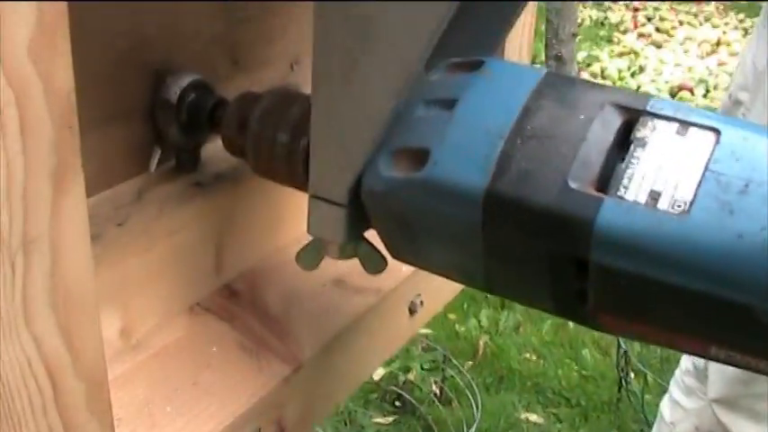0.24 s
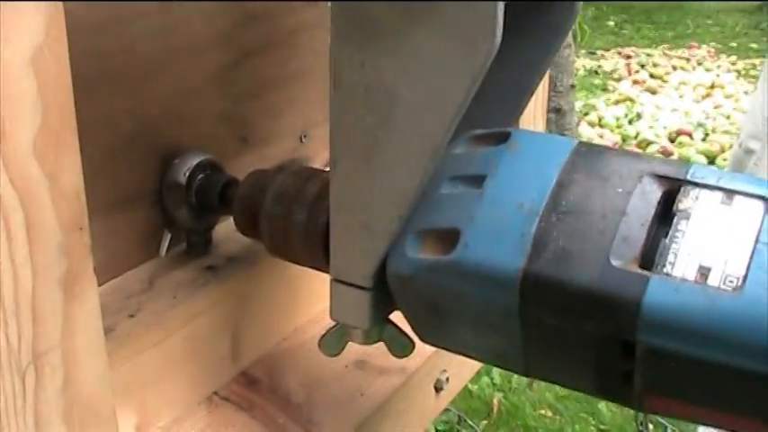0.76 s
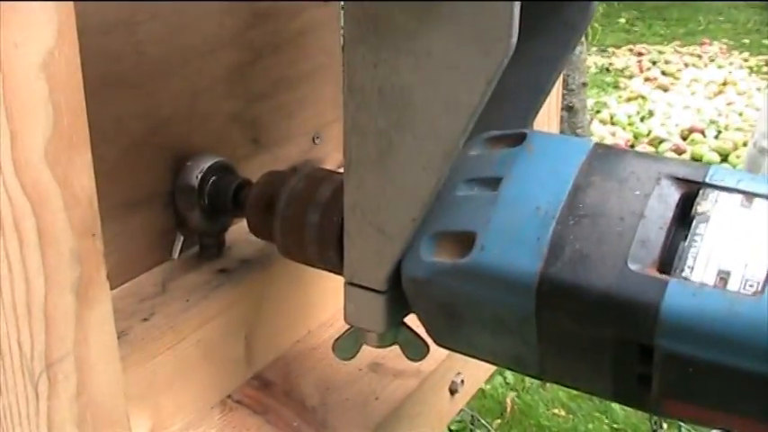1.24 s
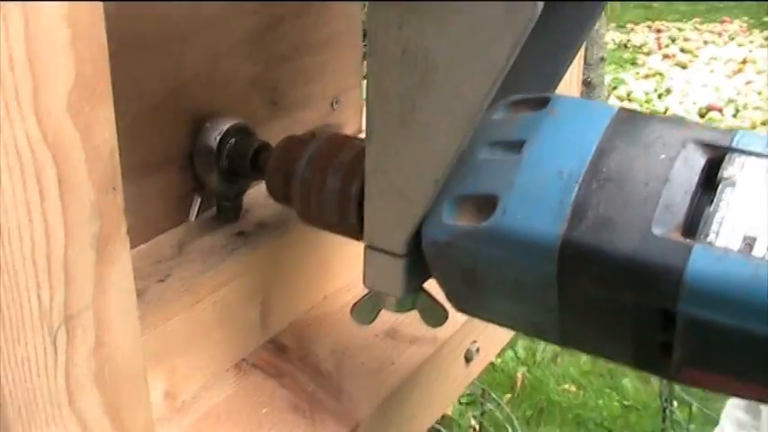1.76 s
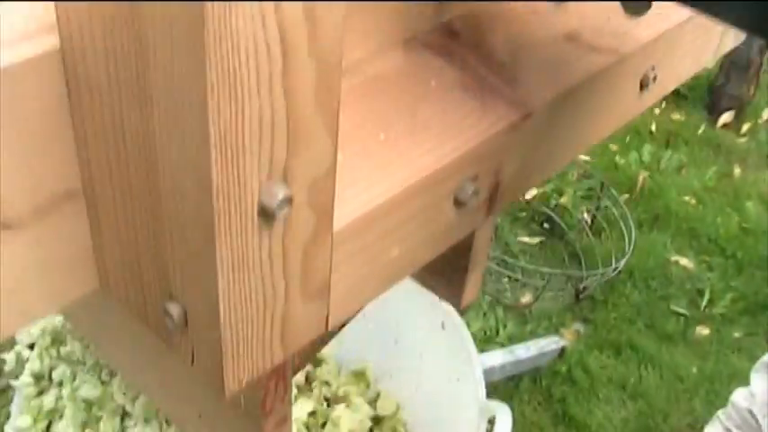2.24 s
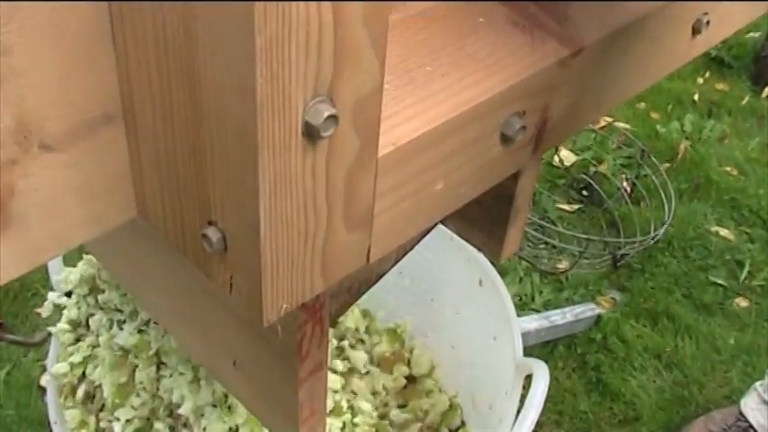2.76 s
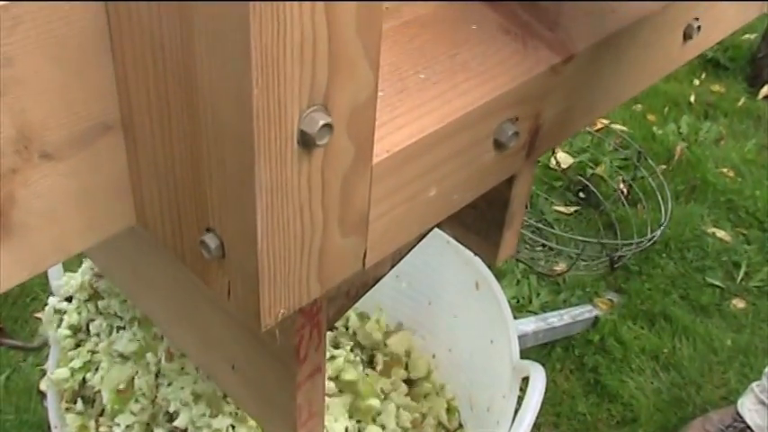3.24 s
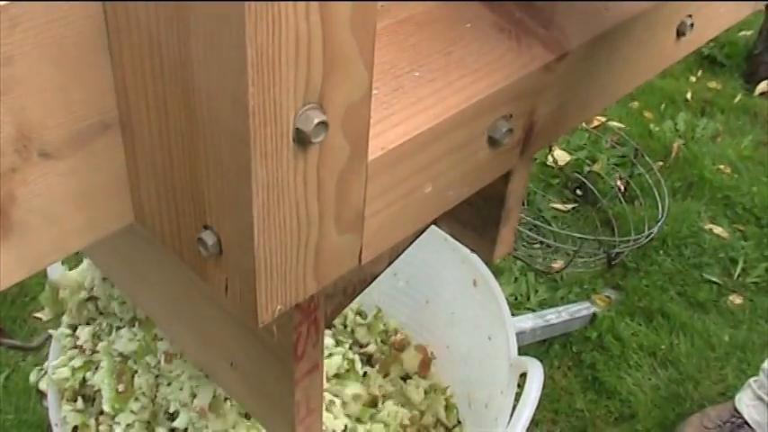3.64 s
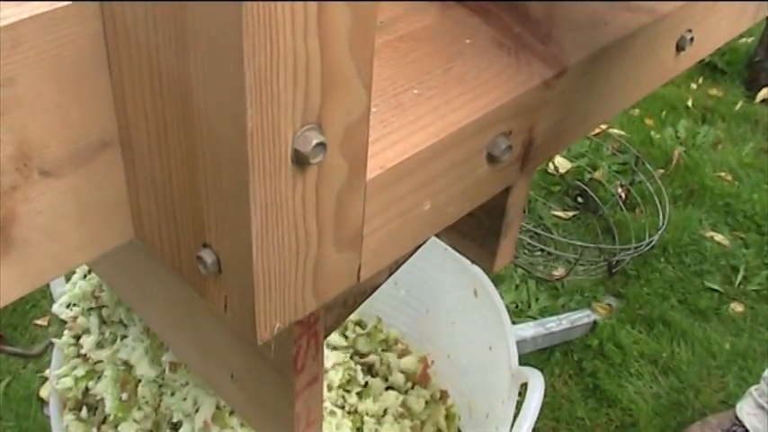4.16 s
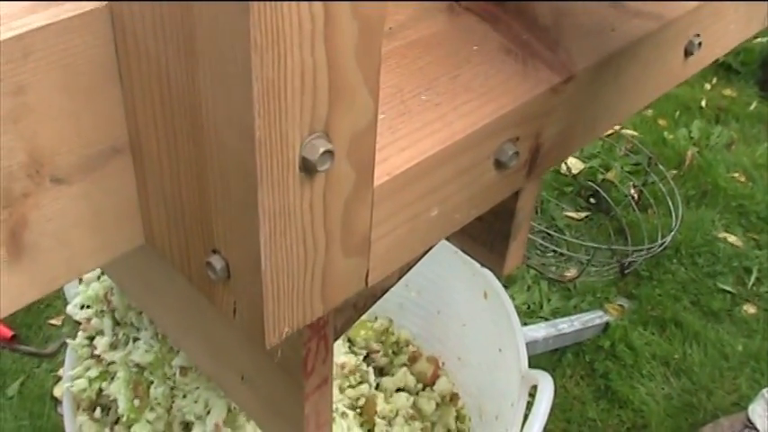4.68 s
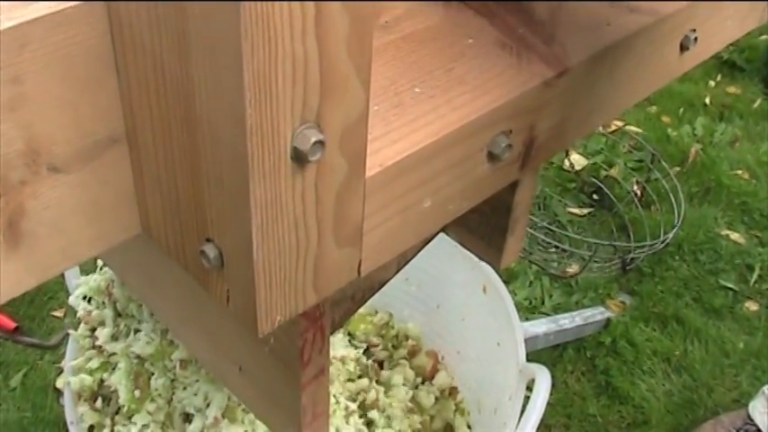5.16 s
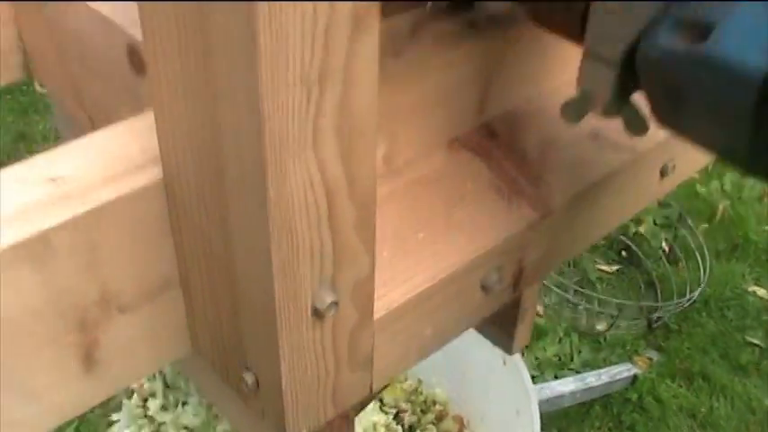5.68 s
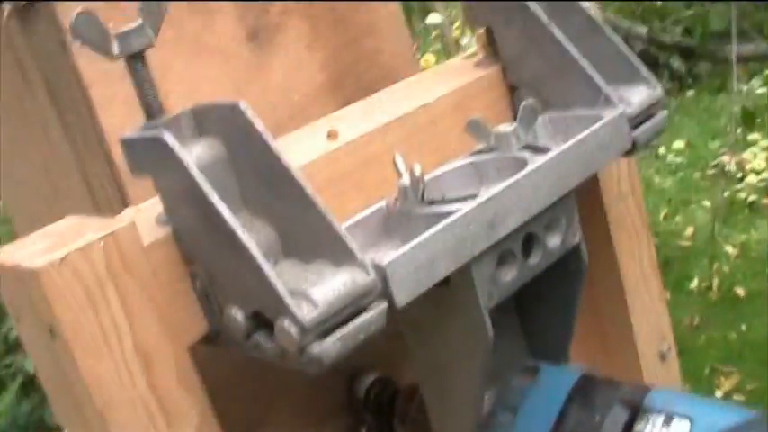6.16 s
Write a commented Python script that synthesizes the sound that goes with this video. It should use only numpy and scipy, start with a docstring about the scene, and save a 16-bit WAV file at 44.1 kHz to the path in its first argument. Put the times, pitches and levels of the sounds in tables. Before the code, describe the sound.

A loud electric drill turns an apple crusher outdoors, heard very close at first. From 0 to 2 seconds a harsh gear whine throbs roughly thirty times a second over bright, rushing fan and brush noise, its pitch wavering slightly. Apples knock irregularly against the wooden hopper with short, dull thumps and crunches, amid a patter of small pieces. Around 2 seconds the microphone moves away; the whine is briefly screened, the throb becomes shallow and the noisy rush grows broader. Knocks are strongest around 2.4 to 3.5 seconds, then lighter, with a bouncing run near 4.2. From 3.6 the load eases, speed climbs and slack gears chatter in quick bursts. By 5 the hopper is empty and the motor races. At 5.5 it is switched off: the whine softens and slides down, with rushing noise, a hollow resonance and sharp gear clacks from 6 until the end at 6.4, still spinning.

```python
"""A whining, throbbing electric drill turns the toothed roller of a wooden apple crusher in a garden.
Its gears, whistle and rushing noise come from tones and filtered noise that follow the motor speed
or change level and colour over time. Apples thump and crunch as decaying tones and noise bursts,
until the hopper runs empty. The motor speeds up, is switched off and coasts with slack, rattling gears.
The listener starts close to the drill and then moves away from it."""
import sys
import numpy as np
from scipy import signal
from scipy.fft import rfft, irfft, next_fast_len
from scipy.io import wavfile
from scipy.ndimage import uniform_filter1d

SR = 44100
rng = np.random.default_rng(int(sys.argv[2]) if len(sys.argv) > 2 else 0)


def dump(signal):
    """Clip the signal to [-1, 1] and save it as 16-bit WAV at the path in sys.argv[1]."""
    limited = np.clip(np.atleast_2d(signal).T, -1, 1)
    pcm = np.round(limited * 32767).astype(np.int16)
    wavfile.write(sys.argv[1], SR, pcm)


N = 282857
T = np.arange(N) / SR  # time of every sample in seconds
FFT_SIZE = next_fast_len(N, True)

# Motor speed. Each row: time in seconds, motor turns per second in Hz.
MOTOR_SPEED = [(0.0, 305.9), (0.12, 298.6), (0.31, 314.2), (0.49, 300.6), (0.78, 306.3), (0.88, 312),
               (0.96, 326), (1.1, 332), (1.21, 326), (1.33, 311), (1.47, 306), (1.61, 334.8), (1.77, 339.5),
               (2.01, 321.8), (2.41, 359.1), (2.67, 368.1), (3.06, 357.8), (3.25, 365.3), (3.45, 362.5),
               (4.35, 434.6), (4.99, 436.5), (5.34, 446.0), (5.54, 437.4), (6.07, 339.3), (6.41, 285.8)]
# Overtones of the main gear tone. Each row: multiple of the tone, relative level in dB.
MAIN_OVERTONES = [(1, 0), (2, -10.5), (3, -10.5), (4, -11)]
# Overtones of the second gear tone. Each row: multiple of the tone, relative level in dB.
SECOND_OVERTONES = [(1, -2), (2, -20), (3, -28), (4, -9), (5, -6), (6, -14)]
# Fan and armature tones. Each row: cycles per motor turn, relative level in dB.
FAN_TONES = [(1.87, -25), (8.35, -20), (9.22, -19), (9.6, -17.5), (11.12, -16.5), (14.3, -22)]
# How the housing favours gear tones at certain speeds.
# Each row: motor turns per second in Hz, main gear level in dB, second gear level in dB.
GEAR_LEVELS = [(299.1, -25.5, -35), (329, -22, -43.5), (338, -22, -30.5), (362, -25.5, -32.5),
               (377, -29.5, -31), (452, -33, -38.5)]
# How hard the main gears grind. Each row: time in seconds, level change in dB.
GRINDING = [(0, 0), (.12, -2), (.34, 3), (.46, -2), (.66, 3), (.8, 1), (1.13, 2.5), (1.3, -1), (1.4, 1),
            (1.53, -2.5), (1.765, 0), (1.8, 5), (1.89, 3), (1.92, 0), (2.2, -1.5), (3.4, -.5), (3.7, -2)]
# Spells of slack gears chattering. Each row: time in seconds, boost in dB, length in seconds.
SLACK_SPELLS = [(3.649, 6, .007), (3.721, 13, .006), (3.761, 8, .006), (3.816, 11.5, .007),
                (3.863, 11, .007), (3.919, 9, .009), (3.973, 8, .006), (3.998, 11, .007), (4.036, 8, .006),
                (4.097, 9, .008), (4.143, 9, .006), (4.186, 12, .006), (4.39, 11, .007), (4.427, 11, .007),
                (4.466, 12, .007), (4.525, 10, .006), (4.609, 10, .009), (4.807, 12, .007),
                (4.87, 10, .007), (5.017, 10, .008), (5.088, 10, .008), (5.151, 11, .008),
                (5.225, 11, .007), (5.289, 12, .007), (5.361, 10, .008), (5.733, 6, .011), (5.874, 7, .013),
                (6.043, 8, .017), (6.222, 7, .013), (6.305, 9, .009), (6.379, 5, .008)]
# Resonances of the gearbox shell. Each row: frequency in Hz, width in Hz, relative level in dB.
SHELL_MODES = [(1957, 260, 16), (2510, 154, 16), (3000, 390, 18.5), (4130, 41, 12.5), (4580, 180, -4),
               (5630, 40, 11.5)]
# Short clacks while the motor coasts; the lower ones ring near the pitch of the main gear tone. # Each row:
# time in seconds, level of the ring in dB, its frequency in Hz.
COAST_CLACKS = [(6.032, -11, 3000), (6.05, -12, 4200), (6.223, -12, 1480), (6.232, -11, 5600),
                (6.302, -10, 5700), (6.309, -9, 5600), (6.376, -10, 1380)]

# Level of the rush of brushes, fan and gearbox. Each row: time in seconds, level in dB.
RUSH_LEVEL = [(0, -24.5), (.7, -22), (1.35, -25), (2.0, -23.5), (2.5, -19.5), (4.7, -18.5), (5.5, -18.5),
              (5.9, -19.5), (6.41, -20)]
# Colour 0 of the rush. Each row: frequency in Hz, relative level in dB.
RUSH_COLOUR_0 = [(80, -28), (250, 5), (600, -10), (850, -5), (1200, -5), (2000, -0.5), (2800, -4),
                 (3800, -2), (5600, -4), (7200, -7.5), (8800, -12.5), (10500, -11.5), (13500, -29)]
# Colour 1 of the rush. Each row: frequency in Hz, relative level in dB.
RUSH_COLOUR_1 = [(80, -15.5), (250, 5.5), (600, -9), (850, -1), (1200, 1.5), (2300, -2), (2800, -0.5),
                 (3800, -4), (5600, -1), (7200, -3.5), (8800, -11), (10500, -10.5), (13500, -25)]
# Colour 2 of the rush. Each row: frequency in Hz, relative level in dB.
RUSH_COLOUR_2 = [(25, -33), (60, -14), (200, -9), (330, -10.5), (520, -2), (850, 0), (1200, 4), (2300, 2),
                 (3800, 3.5), (5600, 1.5), (7200, 1.5), (8800, -11), (10500, -5), (13500, -13)]
# Colour 3 of the rush. Each row: frequency in Hz, relative level in dB.
RUSH_COLOUR_3 = [(25, -27), (60, -27), (200, -7), (330, -13.5), (520, -15), (800, 0.5), (1200, -2),
                 (2800, 0.5), (3800, -5), (5600, 0), (7200, -2.5), (8800, -9.5), (10500, -10), (13500, -65)]
# The four colours of the rush, blended over time; values below 0 count as 0.
# Each row: time in seconds, colour number from 0 to 3.
RUSH_BLEND = [(0, -1), (1.95, 1.8), (2.3, 0.3), (3.4, 2.3), (4.3, 2), (5.5, 2), (5.85, 2.5)]
# Resonances of the drill housing. Each row: frequency in Hz, width in Hz, relative level in dB.
HOUSING_MODES = [(910, 230, 3), (1800, 120, -3.5), (2690, 220, -5), (3780, 210, 1.5), (3930, 140, -8),
                 (4850, 400, 1), (5520, 73, 1), (6230, 82, -2.5)]
# How alike the rush is on both sides. Each row: frequency in Hz, correlation from 0 to 1.
SIDE_LIKENESS = [(100, .98), (640, .97), (1400, .9), (3100, .87), (6800, .76), (14000, .62)]

# Knocks of apples and pieces in the hopper, loud and faint. Each row: time in seconds,
# relative peak level in dB, hardness in dB (higher values bring out the upper tones).
HOPPER_KNOCKS = [(.075, -7, 2), (.156, -15, -9), (.185, -11, 3), (.227, -13, -16), (.3, -11, 3),
                 (.397, -11, 0), (.419, -12, -2), (.486, -9, -3), (.545, -8.5, 1), (.669, -12, -9),
                 (.702, -11, -15), (.756, -11.5, -9), (.839, -12, 5), (.873, -13, 15), (.946, -11, 18),
                 (1.093, -12, -8), (1.128, -9.5, -7), (1.161, -12.5, -1), (1.243, -16, -11),
                 (1.396, -16, -15), (1.419, -20, -7), (1.487, -11, 3), (1.516, -21, 3), (1.582, -13.5, 4),
                 (1.624, -15.5, 1), (1.697, -8, -4), (1.768, -14, 0), (1.839, -13.5, -4),
                 (2.071, -12.5, -14), (2.183, -12, -14), (2.251, -13, 1), (2.282, -11, -28),
                 (2.401, -8.5, -7), (2.427, -7.5, -5), (2.507, -6, -5), (2.557, -12, -10), (2.664, -6.5, 7),
                 (2.8, -19, 22), (2.951, -3.5, -11), (3.012, -9, -21), (3.076, -10, -4), (3.193, -11.5, 6),
                 (3.282, -8, 0), (3.404, -7, -5), (3.435, -11, -5), (3.535, -7.5, -2), (3.607, -14.5, 20),
                 (3.655, -12, 22), (3.706, -8.5, 13), (3.741, -14.5, 26), (3.818, -12.5, 24),
                 (4.043, -14.5, -7), (4.405, -12, 13), (4.522, -15.5, 19), (4.625, -16, 21),
                 (4.645, -12, 23), (4.69, -15.5, 22), (4.735, -16, 22), (4.785, -14, 24), (4.803, -15, 25),
                 (4.825, -13.5, 24)]
# An apple bounces on the roller. Each row: start in seconds, length in seconds,
# gap between knocks in seconds, first and last relative peak level in dB, hardness in dB.
APPLE_BOUNCES = [(1.933, 0.086, 0.029, -12, -12, -26), (2.615, 0.12, 0.024, -9.5, -11, 7),
                 (4.191, 0.289, .051, -7, -13.5, -11.5)]
# Tones of the wooden hopper.
# Each row: frequency in Hz, relative level in dB, time to fall by 60 dB in seconds.
HOPPER_MODES = [(110, -9.5, 0.05), (135, -4.5, 0.11), (140.7, -2.5, 0.062), (184, -0.5, 0.063),
                (207, 1.5, 0.041), (265, -9.5, 0.048), (314.3, -0.5, 0.077), (356, -2.5, 0.063),
                (430, -4, 0.018), (509, -4.5, 0.022), (680, -22, 0.042)]
# Boards too small to give off deep bass. Each row: frequency in Hz, gain in dB.
BOARD_GAIN = [(30, -52), (60, -24), (85, -14), (120, 1), (200, 1.5)]
# Air resonance of the emptying hopper, with a shifting pitch.
# Each row: time in seconds, frequency in Hz, level in dB.
HOLLOW_TONE = [(3.799, 830, -51), (4.5, 830, -32.5), (5.4, 840, -38), (5.699, 780, -30.5), (6, 900, -29.5),
               (6.41, 980, -29)]
# Colour of the open air. Each row: frequency in Hz, relative level in dB.
AIR_COLOUR = [(25, -8), (50, 3), (100, 8), (200, 6), (500, 2), (2000, -53)]

# Level difference of the two sides. Each row: frequency in Hz, left minus right in dB.
SIDE_BALANCE = [(60, 1), (110, -2.5), (200, -1.5), (380, -0.9), (700, -2), (1290, -2.5), (2380, -4),
                (4400, -3), (8120, -1), (15000, -6.5)]
# Phase difference of the two sides. Each row: frequency in Hz, lead of the left in radians.
SIDE_PHASE = [(50, 1), (130, 0.45), (260, 0.37), (600, -0.17), (2070, 0.64), (5430, 0.34), (7750, -1.1),
              (9040, -1.33), (10200, -1.36), (13000, -1.6), (14100, -1.4), (15600, -5.1)]

# spindle turns per motor turn, and the spindle angle at the start in turns
SPINDLE_PER_SHAFT, SPINDLE_START = .0986, .05
# tones in cycles per motor turn: main gears, second gears, commutator bars, hum
MESH_ORDER, SECOND_ORDER, BAR_ORDER, HUM_ORDER = 4.61, 3.175, 36, .93
# the motor is switched off (seconds) and the unloaded gears sing more softly (dB)
OFF_S, OFF_FADE_S, COAST_DB = 5.5, 0.15, -18
# the listener leaves the drill and passes behind a post, which screens the gear tones
LEAVE_S, LEAVE_LENGTH_S = 1.98, 0.28
POST_S, POST_LENGTH_S, POST_DB = 2.09, 0.18, -6.5
# share of the throb (0-1) close to the drill and away from it
THROB_CLOSE, THROB_AWAY = 0.76, 0.12
# the gears stop binding for a moment and lose this share of the throb
EASE_S, EASE_LENGTH_S, EASE_SHARE = 0.49, 0.12, 0.77
# commutator whistle: level away from the drill, change close to it, slow wavering
WHISTLE_DB, WHISTLE_CLOSE_DB, WHISTLE_WAVER_DB = -35, -13, 2.5
# part of the rush's power that comes from the fan and does not throb
FAN_SHARE = 0.58
# the hopper is full, runs low, then is empty
FULL_UNTIL_S, RUN_LOW_LENGTH_S, EMPTY_S, EMPTY_LENGTH_S = 3.58, 0.095, 4.92, 0.19
# tumbling pieces: level when full, change when low, wavering
TUMBLE_DB, TUMBLE_LOW_DB, TUMBLE_WAVER_DB = -27, -7.5, 1.5


def drill(turns):
    """Rush, gears, shell, clacks and motor tones add up; slack gears also jolt the rush."""
    press, slack = throb(turns), chatter()
    jolt = slack ** (0.2 + 0.38 * motor_off())
    # the gear tones swell slightly ahead of the rush, by this part of a spindle turn
    gear_press = throb(turns, lead=0.066)
    sound = rush(press) * jolt + gears(turns, gear_press, slack)
    return sound + gearbox(turns, press) + clacks() + motor_tones(turns)


def gears(turns, press, slack):
    """Two pairs of meshing gears whine; the main pair throbs most."""
    edge = (.5 + 0.03 * binding()) / slack ** .4
    # the teeth flex under load, which bends the pitch within each throb
    flex = .2 * np.log(press)
    main = mesh(MESH_ORDER * turns + flex, MAIN_OVERTONES,
                wander=1.1, rough=0.42, flutter_db=1.6, edge=edge)
    second = mesh(SECOND_ORDER * turns, SECOND_OVERTONES,
                  wander=0.77, rough=0.3, flutter_db=3.5, edge=1 / np.sqrt(slack))
    hz, main_db, second_db = np.transpose(GEAR_LEVELS)
    speed = curve(MOTOR_SPEED)
    main = main * press * undb(np.interp(speed, hz, main_db) + curve(GRINDING))
    second = second * press ** .5 * undb(np.interp(speed, hz, second_db))
    heard = undb(POST_DB * bump(POST_S, POST_LENGTH_S) + COAST_DB * motor_off())
    return heard * slack * (main + second)


def mesh(turns, overtones, wander, rough, flutter_db, edge):
    """Gear teeth meet a little early or late, which smears the higher overtones most."""
    phase = 2 * np.pi * turns + wander * walk(35) + rough * walk(330)
    tones = [undb(db + flutter_db * walk(70)) * np.sin(multiple * phase) for multiple, db in overtones]
    # edge scales everything above the first tone
    return np.sqrt(2) * (tones[0] + edge * sum(tones[1:]))


def throb(turns, lead=0):
    """The spindle runs out of true and presses the gears together for about half of each turn."""
    phase = SPINDLE_PER_SHAFT * turns + SPINDLE_START + lead + .012 * walk(25)
    depth = 1.55 * binding()
    # the division keeps the average power the same at any depth
    return np.exp(depth * np.cos(2 * np.pi * phase)) / np.sqrt(np.i0(2 * depth))


def binding():
    """Gears that bind harder throb more deeply: a share from 0 to 1."""
    depth = THROB_AWAY + (THROB_CLOSE - THROB_AWAY) * closeness()
    return np.clip(depth * (1 - EASE_SHARE * bump(EASE_S, EASE_LENGTH_S)), 0, 1)


def chatter():
    """Slack teeth hit each other in short spells, each a brief rise in gain."""
    boosts = [db / (1 + ((T - s) / length) ** 2 / 2) ** 2 for s, db, length in SLACK_SPELLS]
    return undb(sum(boosts))


def gearbox(turns, press):
    """Every tooth strikes the shell with its own force, heard only until the listener has left the drill."""
    teeth = np.diff(np.floor(MESH_ORDER * turns + .1 * walk(60)), prepend=0)
    force = (0.4 + rng.uniform(-np.sqrt(3), np.sqrt(3), N)) * press * closeness()
    ringing = resonate(teeth * force, SHELL_MODES)
    return undb(-28.5) * colour(ringing, [(60, -40), (1200, 0)])  # less bass


def clacks(cycles=55, tick_db=-9, tick_s=0.00098):
    """While the motor coasts, short clacks sound, each a sharp tick and a short ring."""
    count = SR // 10
    t, out = T[:count], np.zeros(N + count)
    for s, peak_db, hz in COAST_CLACKS:
        # the ring falls by 60 dB within the given number of cycles
        tone = np.sin(2 * np.pi * hz * t) * undb(-60 * t * hz / cycles)
        tick = undb(tick_db) * rng.standard_normal(count) * np.exp(-t / tick_s)
        start = int(s * SR)
        out[start:start + count] += undb(peak_db) * (tone + uniform_filter1d(tick, size=3))
    return out[:N]


def rush(press):
    """Air, brush sparks and tooth impacts ring the housing, and part of the noise swells with each throb."""
    grit = np.array([unit(rng.standard_normal(N) + 0.44 * unit(clicks(2600, 3.8))) for _ in range(2)])
    grit = wide(grit, SIDE_LIKENESS)
    grit = grit + 0.16 * resonate(grit, HOUSING_MODES)
    blend = np.clip(curve(RUSH_BLEND), 0, 3)
    sound = 0
    for k, points in enumerate([RUSH_COLOUR_0, RUSH_COLOUR_1, RUSH_COLOUR_2, RUSH_COLOUR_3]):
        share = np.clip(1 - abs(blend - k), 0, 1)
        sound = sound + share * colour(grit, points)
    swell = np.sqrt(FAN_SHARE + (1 - FAN_SHARE) * press ** 2)
    return sound * swell * undb(curve(RUSH_LEVEL) + 1.12 * walk(55))


def motor_tones(turns):
    """Brushes whistle over the commutator bars; fan and armature hum under it."""
    bars = np.sin(2 * np.pi * BAR_ORDER * turns + 1.1 * walk(90) + .4 * walk(600))
    whistle_db = WHISTLE_DB + WHISTLE_CLOSE_DB * closeness()
    whistle_db = whistle_db + WHISTLE_WAVER_DB * walk(3.8) + 3.0 * walk(45)
    whistle = np.sqrt(2) * bars * undb(whistle_db)
    fan = 0
    for order, db in FAN_TONES:
        phase = 2 * np.pi * order * turns + 2.04 * walk(25) + 0.71 * walk(260)
        fan = fan + undb(db + 2.95 * walk(40)) * np.sin(phase)
    # the fan grows loud with speed
    speed = curve(MOTOR_SPEED)
    return whistle + undb(-13.5) * fan * (speed / np.max(speed)) ** 2.85


def hum(turns, db=-38.5):
    """The free-running motor hums faintly from when the hopper empties until it is switched off."""
    tone = np.sin(2 * np.pi * HUM_ORDER * turns + 0.26 * walk(20))
    return undb(db) * tone * (ramp(EMPTY_S, 0.084) - ramp(OFF_S, 0.074))


def crusher():
    """Knocks and tumbling pieces shake the boards, which are too small to give off deep bass."""
    return shaped(tumble() + knocks(), undb(over_bins(BOARD_GAIN)))


def knocks(scatter_db=3.0, crunch_db=-19, crunch_s=0.0047, push_s=0.00066):
    """Each knock thumps the hopper with a short crunch; hard knocks favour the upper modes."""
    count = SR // 10
    t, out = T[:count], np.zeros(N + count)
    hz, db, t60 = np.transpose(HOPPER_MODES)[:, :, None]
    for s, peak_db, hard_db in blows():
        gain, detune = rng.standard_normal((2, len(HOPPER_MODES), 1))
        # hardness tilts the balance around 250 Hz
        tilt_db = (hard_db + 2.5) * 0.67 * np.tanh(4 * np.log2(hz / 250))
        weight = undb(db + scatter_db * gain + tilt_db)
        # the last loose pieces land softly and spare the highest modes
        weight = weight * undb(-8 * (s > FULL_UNTIL_S) * (hard_db > 0) * (hz > 380))
        # each mode first moves one way or the other, by chance
        weight = weight * rng.choice([-1, 1], hz.shape)
        tones = np.sin(2 * np.pi * hz * (1 + .04 * detune) * t)
        thump = np.sum(weight * tones * undb(-60 * t / t60), axis=0)
        thump = thump * (1 - np.exp(-t / push_s))
        crunch = uniform_filter1d(rng.standard_normal(count) ** 3, size=6) * np.exp(-t / crunch_s)
        start = int(s * SR)
        blow = thump / np.max(abs(thump)) + undb(crunch_db) * crunch
        out[start:start + count] += undb(peak_db - 1.96) * blow
    return out[:N]


def blows():
    """Single knocks and the evenly spaced knocks of bouncing apples, as (seconds, peak dB, hardness dB)."""
    rows = list(HOPPER_KNOCKS)
    for start, length, gap, first_db, last_db, hard_db in APPLE_BOUNCES:
        for s in np.arange(0, length, gap):
            rows.append((start + s, first_db + (last_db - first_db) * s / length, hard_db))
    return rows


def tumble():
    """Small pieces patter on the roller and walls, ringing the hopper until it is empty."""
    shared = clicks(150, 3.25)
    body = 0
    for k, (hz, db, t60) in enumerate(HOPPER_MODES):
        # every mode feels the shared impacts and some of its own
        impacts = (-1) ** k * 0.56 * shared + clicks(150, 1.5)
        body = body + undb(db) / np.sqrt(t60) * ring(impacts, hz, t60)
    level_db = TUMBLE_DB + TUMBLE_LOW_DB * ramp(FULL_UNTIL_S, RUN_LOW_LENGTH_S)
    level_db = level_db + TUMBLE_WAVER_DB * walk(6.6)
    return unit(body) * undb(level_db) * (1 - ramp(EMPTY_S, EMPTY_LENGTH_S))


def hollow(wander_rate=230):
    """The air in the emptying hopper resonates: a narrow band of noise around a moving pitch."""
    s, hz, db = np.transpose(HOLLOW_TONE)
    phase = 2 * np.pi * np.cumsum(np.interp(T, s, hz)) / SR
    band = walk(wander_rate) * np.cos(phase) + walk(wander_rate) * np.sin(phase)
    return unit(band) * undb(np.interp(T, s, db))


def open_air():
    """The open air is a very quiet, low noise, separate on each side."""
    return undb(-76) * colour(rng.standard_normal((2, N)), AIR_COLOUR)


def closeness():
    """1 while the listener is close to the drill, falling to 0 on leaving."""
    return 1 - ramp(LEAVE_S, LEAVE_LENGTH_S)


def motor_off():
    """0 while the motor is powered, rising to 1 after it is switched off."""
    return ramp(OFF_S, OFF_FADE_S)


def ramp(start, length):
    """Rises from 0 to 1 in a straight line."""
    return np.clip((T - start) / length, 0, 1)


def bump(centre, length):
    """Swells to 1 and falls back."""
    return np.exp(-((T - centre) / length) ** 2)


def curve(table):
    """Joins (seconds, value) points by straight lines in time."""
    return np.interp(T, *np.transpose(table))


def walk(rate):
    """Random wavering with a spread near 1, aiming for a new value `rate` times per second."""
    steps = rng.standard_normal(N // 40)
    return np.interp(T * rate, np.arange(len(steps)), steps) * np.sqrt(3 / 2)


def clicks(rate, spread_db):
    """Random impacts of very uneven size, `rate` per second."""
    where, size, sign = rng.random((N // 8, 3))[:int(rate * N / SR)].T
    tall = np.minimum(-np.log(1 - size), 4)
    return np.bincount((where * N).astype(int), undb(spread_db * tall) * np.sign(sign - .5), N)


def ring(x, hz, t60):
    """One damped mode: each impact starts a tone that falls by 60 dB in t60 seconds."""
    pole = np.exp((2j * np.pi * hz - np.log(1000) / t60) / SR)
    return signal.lfilter([0, pole.imag], [1, -2 * pole.real, abs(pole) ** 2], x)


def resonate(x, modes):
    """A body rings at several resonances; a narrower one rings longer."""
    total = 0
    for hz, width, db in modes:
        total = total + undb(db) * np.sqrt(width) * ring(x, hz, np.log(1000) / np.pi / width)
    return unit(total)


def wide(pair, likeness):
    """Mixes two unrelated sounds so that both sides share the bass and differ in the treble."""
    share = np.clip(over_bins(likeness), 0, 1)
    mid, side = shaped(pair, np.sqrt([1 + share, 1 - share]))
    return unit(np.array([mid + side, mid - side]))


def colour(x, points):
    """Filters by (Hz, dB) points and evens out the loudness."""
    return unit(shaped(x, undb(over_bins(points))))


def shaped(x, response):
    """Filters by a gain at each frequency."""
    return irfft(rfft(x, FFT_SIZE) * response, FFT_SIZE)[..., :N]


def over_bins(points):
    """Joins (Hz, value) points on a log-frequency axis."""
    hz, value = np.transpose(points)
    return np.interp(np.log(np.fft.rfftfreq(FFT_SIZE, 1 / SR) + 1), np.log(hz + 1), value)


def undb(db):
    """Turns decibels into a gain."""
    return 10 ** (np.asarray(db) / 20)


def unit(x):
    """Scales to an average (RMS) level of 1."""
    return x / np.sqrt(np.mean(x ** 2))


def scene():
    """Drill and crusher in the open air."""
    turns = np.cumsum(curve(MOTOR_SPEED)) / SR  # motor turns so far
    return drill(turns) + hum(turns) + crusher() + hollow() + open_air()


def record(dry):
    """The two sides hear the sound slightly out of step; the top is cut steeply."""
    lean = undb(over_bins(SIDE_BALANCE) / 2) * np.exp(.5j * over_bins(SIDE_PHASE))
    heard = shaped(dry, np.array([lean, 1 / lean]))
    top_cut = signal.ellip(10, .2, 80, 15700, fs=SR, output="sos")  # low-pass at 15700 Hz
    return signal.sosfilt(top_cut, heard)


dry = scene()
out = record(dry)
dump(out)
```